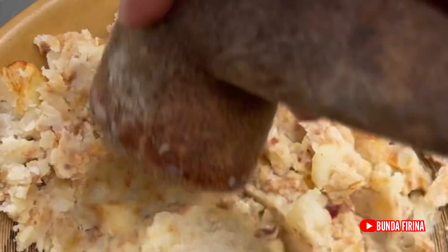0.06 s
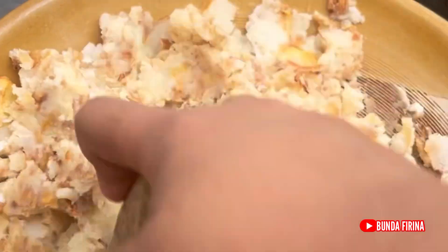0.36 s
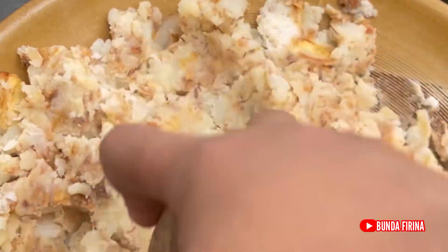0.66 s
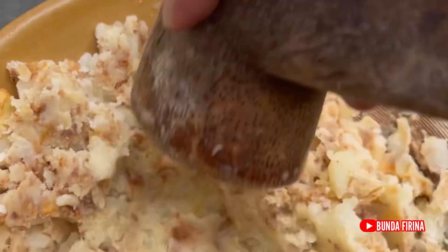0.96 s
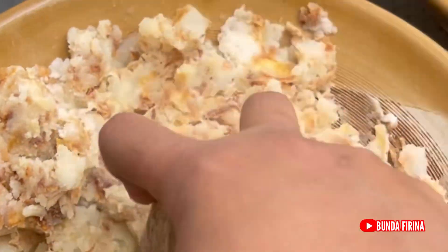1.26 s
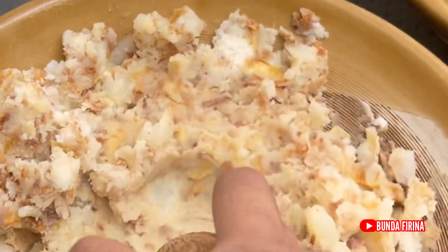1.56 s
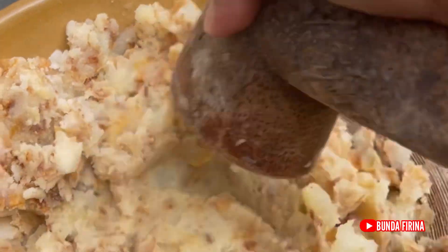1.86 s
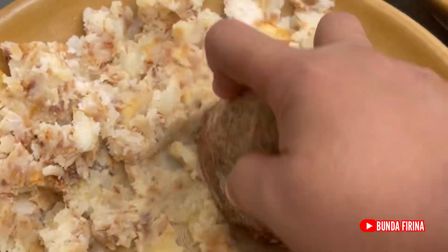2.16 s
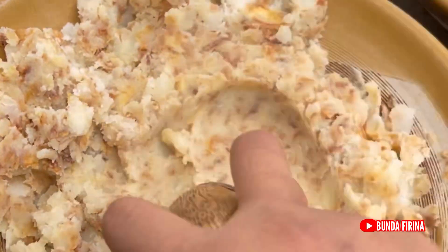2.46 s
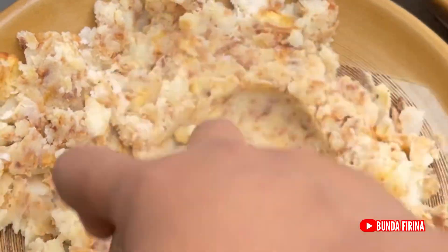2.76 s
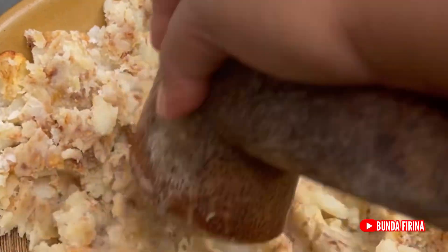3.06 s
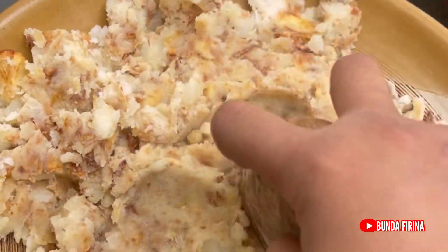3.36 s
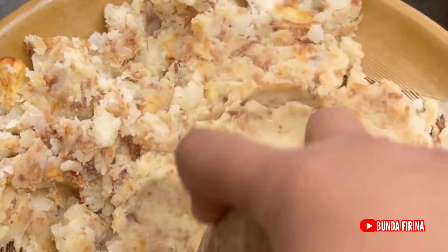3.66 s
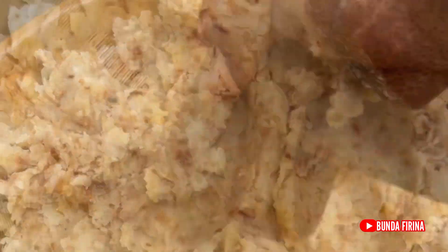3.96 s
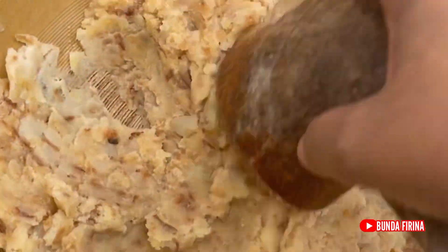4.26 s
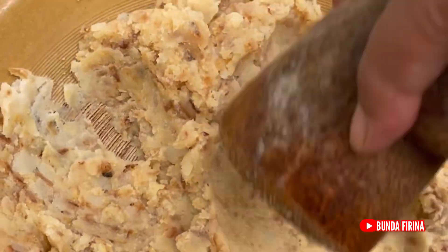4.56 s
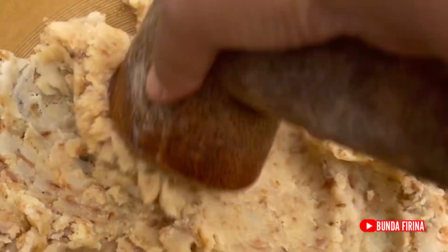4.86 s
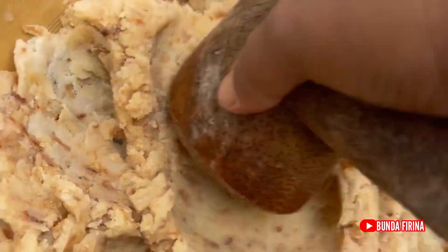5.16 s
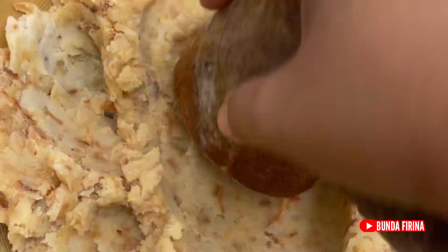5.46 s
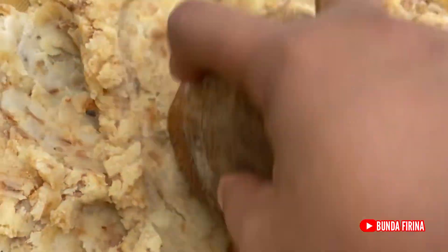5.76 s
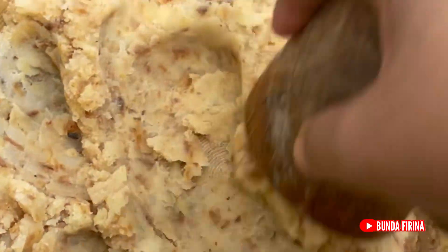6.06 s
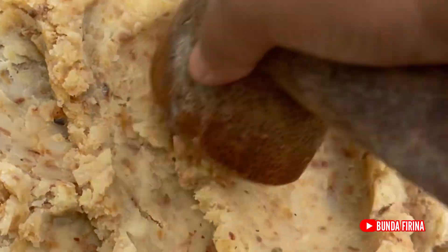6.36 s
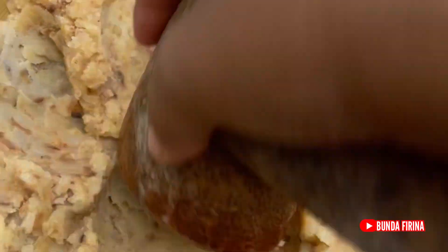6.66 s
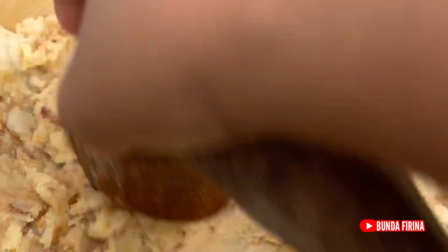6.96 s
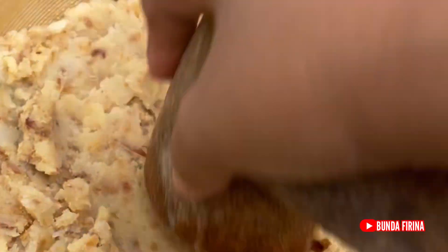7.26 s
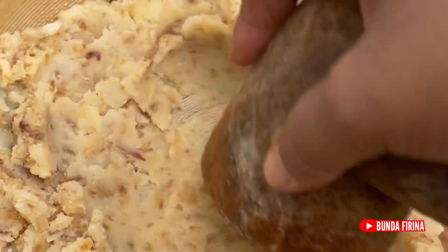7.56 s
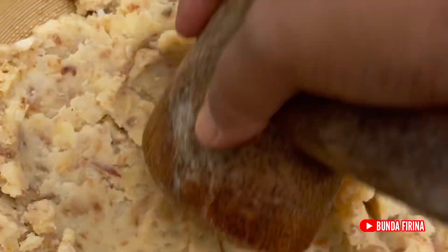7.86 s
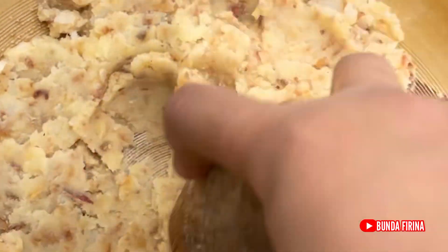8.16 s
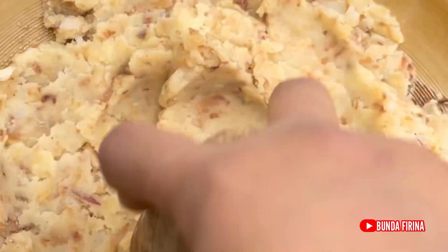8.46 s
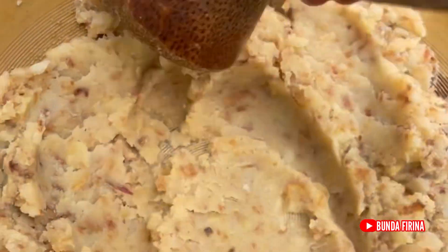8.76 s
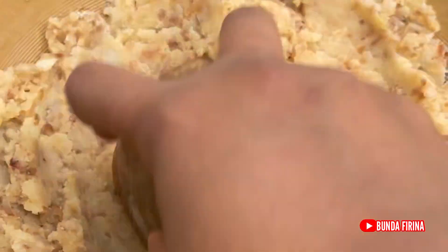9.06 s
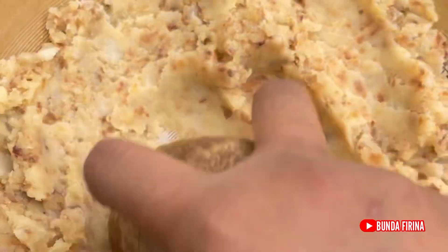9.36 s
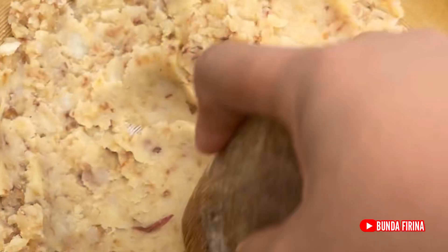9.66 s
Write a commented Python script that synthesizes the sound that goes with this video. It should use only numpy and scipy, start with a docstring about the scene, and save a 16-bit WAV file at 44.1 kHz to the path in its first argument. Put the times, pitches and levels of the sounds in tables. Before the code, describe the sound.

Close, uneven thumps and sticky squishing of potato being pounded in a bowl, with occasional sharp knocks and brief bird chirps.

```python
"""Thuds and wet squelches: a stone pestle mashes soft cooked potato in a ribbed bowl, close by.
Strokes rumble through the table, crush lumps and squeeze out wet mash, with an occasional smack;
now and then the pestle knocks through to the bowl. Shrill chirps, probably a cage bird, echo in
the kitchen over a low hum and one faint whine. The sound cuts out briefly once, and after seven
seconds it starts over."""
import sys
import numpy as np
from scipy import signal
from scipy.fft import rfft, irfft, next_fast_len
from scipy.io import wavfile
from scipy.ndimage import uniform_filter1d, map_coordinates

SR = 44100
rng = np.random.default_rng(int(sys.argv[2]) if len(sys.argv) > 2 else 0)


def unload_audio(sound):
    """Save the sound as a 16-bit wav file, at the path given as the first command line argument."""
    columns = np.transpose(np.atleast_2d(sound))
    # keep every value between -1 and 1, then stretch to whole-number steps
    steps = np.round(np.clip(columns, -1, 1) * 32767)
    wavfile.write(sys.argv[1], SR, steps.astype(np.int16))


N = 433062

# Strokes, from touching the mash to lifting off: start_s, end_s, rumble_db, squelch_db, crackle_db
STROKES = [(0.059, 0.544, -34.5, -46, -45), (0.667, 1.301, -37.5, -46, -46),
           (1.337, 1.702, -36.5, -47, -53), (1.796, 2.26, -38.5, -45.5, -43), (2.445, 2.7, -32, -41.5, -45),
           (2.901, 3.372, -28.5, -42, -41.5), (3.444, 3.75, -48, -42, -43.5),
           (3.779, 4.206, -50, -46.5, -43.5), (4.506, 5.136, -57.5, -48, -45.5),
           (5.258, 5.727, -33.5, -44.5, -46), (5.917, 6.19, -33.5, -43, -42),
           (6.476, 6.953, -36, -50.5, -47)]
TOUCH_S, LIFT_DB_PER_S = 0.02, 622  # the pestle sinks in; the sound dies as it lifts
# Firm lumps collapsing under the pestle: start_s, length_s, rumble_db
LUMPS = [(0.187, 0.13, -26.5), (0.43, 0.13, -28), (2.141, 0.085, -28), (2.451, 0.11, -26.5),
         (3.225, 0.079, -21), (3.612, 0.13, -35.5), (3.925, 0.044, -29.5), (4.788, 0.044, -34.5),
         (4.949, 0.2, -33.5), (5.312, 0.075, -29.5), (5.641, 0.08, -33.5), (5.958, 0.1, -30)]
# The deep tone of the table: frequency_hz, level_db
TABLE_TONE = [(25, -65), (50, 2), (110, 2.5), (195, 6), (250, -6.5), (310, -0.5), (600, -10.5),
              (800, -14.5), (1000, -28), (1800, -34.5), (3500, -49)]

def pestle_rumble(yield_db_per_s=14.5, crush_s=0.005, settle_db_per_s=279):
    """Grinding and collapsing lumps shake the table, less and less as the potato gives way."""
    grinding = envelope([row[:3] for row in STROKES], TOUCH_S, -yield_db_per_s, LIFT_DB_PER_S)
    lumps = [(start, start + length, db) for start, length, db in LUMPS]
    crushing = envelope(lumps, crush_s, -yield_db_per_s, settle_db_per_s)
    grit = grains(per_s=420, decay_s=0.00057, scatter_db=2, tone=TABLE_TONE, steady_s=0.06)
    return np.sqrt(grinding + crushing) * grit

# The pestle landing: start_s, level_db, hardness_hz (low when potato cushions it), clack_db (bare stone)
KNOCKS = [(0.077, -29, 790, -15), (0.191, -21, 1000, -11.5), (0.29, -25, 900, -13.5),
          (0.363, -25, 800, -15.5), (0.448, -16.5, 744, -9.5), (0.672, -13.5, 1750, -7.5),
          (0.725, -14.5, 800, -8), (1.133, -18.5, 740, -5.5), (1.807, -16.5, 644, 6.5),
          (1.908, -14.5, 710, 8), (2.109, -17.5, 640, -7), (2.396, -7.5, 3100, 2), (2.825, -18.5, 730, -12),
          (2.977, -15.5, 805, -5), (3.166, -21, 800, -7.5), (3.239, -16.5, 770, -5.5),
          (3.862, -14, 1670, -4.5), (3.907, -17.5, 840, -9), (5.026, -20.5, 750, -6.5),
          (5.281, -21.5, 940, -14.5), (5.392, -25.5, 1470, 9), (6.3597, -8, 3430, 20),
          (6.3635, -23, 2430, 18), (6.532, -23, 800, -10.5), (6.729, -26, 730, -9.5), (6.829, -24, 700, -5)]
# The notes the bowl rings with on its table: pitch_hz, level_db, ring_s (undamped time to fade 60 dB)
BOWL_NOTES = [(116.3, -8, 0.28), (180.5, -3, 0.2), (305, -17, 0.31), (475, -11, 0.12), (744, -10.5, 0.22),
              (1335, 1, 0.014), (1648, -10.5, 0.16), (1730, -5.5, 0.014), (2160, -9.5, 0.0081),
              (2803, -11, 0.1), (4260, -6, 0.086)]

def bowl_knocks(damping_hz=1400, push_db=14, rattle_db=-10, rattle_s=0.16, clack_hz=2000):
    """Each landing shoves the table and rings the bowl; potato under the pestle dulls and damps it."""
    out, t = np.zeros(N), np.arange(SR // 2) / SR
    hz, note_db, ring_s = np.transpose(BOWL_NOTES)[:, :, None]
    # Bare stone drives the short-lived middle notes and spares the low ones.
    clack_share = np.exp(-(np.log(hz / clack_hz) / 0.18) ** 2 - ring_s / 0.1)
    for start, level_db, hardness_hz, clack_db in KNOCKS:
        ring_share = hardness_hz ** 2 / (hardness_hz ** 2 + damping_hz ** 2)
        bass_loss_db = 0.32 * max(clack_db, 0) * (hz < 600)
        strength_db = note_db + clack_db * clack_share - bass_loss_db + rng.normal(0, 1, hz.shape)
        notes = amp(strength_db - 60 * t / (ring_s * ring_share)) * np.sin(2 * np.pi * hz * t)
        ring = notes[::2].sum(axis=0) - notes[1::2].sum(axis=0)  # neighbours start opposite ways
        push = amp(push_db) * (t == 0)
        rattle = amp(rattle_db - 60 * t / rattle_s) * rng.standard_normal(len(t))
        thud = amp(-0.8 * clack_db) * coloured(push + rattle, TABLE_TONE)  # bare hits hardly thud
        cushion = signal.butter(10, hardness_hz, fs=SR, output="sos")
        add(out, start, amp(level_db) * signal.sosfilt(cushion, ring + thud))
    return out

def through_table(x, lag=0.1475):
    """Bending waves in the table bring the low notes last."""
    def response(hz):
        delay_s = lag * np.maximum(1 / np.sqrt(hz + 40) - 1 / np.sqrt(1300), 0)
        return np.exp(-2j * np.pi * np.cumsum(delay_s) * hz[1])
    return filtered(x, response)

# The tone of potato being flattened: frequency_hz, level_db
SPLAT_TONE = [(600, -14), (1000, 10), (1400, 7), (2000, -2.5), (3500, -9.5), (15000, -34)]

def splats(length_s=0.0021, splat_db=-25):
    """Each landing flattens potato with a short, gritty squish, weaker when the stone lands bare."""
    landings = [(start, start + length_s, db - max(clack_db, 0)) for start, db, _, clack_db in KNOCKS]
    swell = np.sqrt(envelope(landings, rise_s=0.0023, slope_db_per_s=0, fade_db_per_s=300))
    grit = grains(per_s=900, decay_s=0.0012, scatter_db=3.5, tone=SPLAT_TONE, steady_s=0.017)
    return amp(splat_db) * swell * grit

# Wet mash squirting out from under the pestle: start_s, length_s, squelch_db, crackle_db
SQUEEZES = [(0.205, 0.045, -39, -37), (0.43, 0.068, -38, -37), (0.912, 0.087, -44.5, -33.5),
            (1.109, 0.03, -41, -36), (1.226, 0.043, -41.5, -34), (1.463, 0.11, -43.5, -38),
            (1.586, 0.072, -45, -39.5), (1.853, 0.17, -46, -38.5), (2.159, 0.033, -39, -32.5),
            (2.195, 0.072, -36.5, -38), (2.565, 0.044, -35, -40), (3.017, 0.045, -52, -37),
            (3.265, 0.047, -37.5, -33.5), (3.539, 0.019, -38.5, -36), (3.643, 0.081, -58, -38),
            (4.055, 0.024, -55, -33), (4.792, 0.031, -41.5, -34.5), (4.96, 0.01, -32, -27),
            (5.065, 0.024, -37.5, -32.5), (5.346, 0.11, -39.5, -42.5), (5.575, 0.019, -42, -36.5),
            (5.675, 0.039, -34, -35.5), (6.56, 0.026, -37, -38), (6.656, 0.11, -44.5, -44),
            (6.836, 0.063, -40, -36)]
# The tone of the squelch: frequency_hz, level_db
SQUELCH_TONE = [(600, -19), (1300, -3.5), (2600, 1.5), (6000, 4), (9000, -3.5), (15000, -22)]
# The tone of the crackle, with the microphone's bright ring near 11 kHz: frequency_hz, level_db
CRACKLE_TONE = [(1000, -30.5), (3000, -16.5), (6000, -4.5), (8000, -2.5), (9800, 0), (11200, 6.5),
                (12100, -4.5), (13000, -7.5), (14000, -29), (15700, -66)]

def wet_mash(clump_db=2.5, squelch_db=-0.5, fizz_db=-1, snaps_db=-1.9, wet_snaps_db=-8.5, cling_db=-62):
    """Squeezed potato squelches; its sticky films tear in a fine fizz and snaps, fuller where wet."""
    *_, stroke_squelch, stroke_crackle = np.transpose(STROKES)
    *_, squeeze_squelch, squeeze_crackle = np.transpose(SQUEEZES)
    flow = wetness(stroke_squelch, squeeze_squelch)
    tearing = wetness(stroke_crackle, squeeze_crackle) + amp(cling_db)  # clinging mash keeps crackling
    wet_grains = grains(per_s=1100, decay_s=0.0011, scatter_db=6, tone=SQUELCH_TONE, steady_s=0.08)
    squelch = amp(squelch_db) * flow * air_channels(wet_grains)
    fine_grains = grains(per_s=1500, decay_s=0.0003, scatter_db=5, tone=CRACKLE_TONE, steady_s=0.05)
    fizz = amp(fizz_db) * tearing * fine_grains
    ticks = grains(per_s=70, decay_s=0.0004, scatter_db=3, tone=CRACKLE_TONE, steady_s=0.38)
    snaps = amp(snaps_db) * tearing * ticks + amp(wet_snaps_db) * flow * unit(muffled(ticks))
    return amp(clump_db * drift(18, N)) * (squelch + fizz) + snaps

def wetness(strokes_db, squeezes_db, swell_db_per_s=39):
    """Loudness of a wet layer: each stroke smears; each squeeze builds, then stops short."""
    start, end = np.transpose(STROKES)[:2]
    smearing = envelope(zip(start, end, strokes_db), TOUCH_S, 0, LIFT_DB_PER_S)
    start, length = np.transpose(SQUEEZES)[:2]
    squeezes = zip(start, start + length, squeezes_db - swell_db_per_s * length / 2)
    squirting = envelope(squeezes, rise_s=0.011, slope_db_per_s=swell_db_per_s, fade_db_per_s=769)
    return np.sqrt(smearing + squirting)

def air_channels(x, centre_hz=2700, roam=0.31):
    """Air channels in the mash change size, so the pitch they boost wanders."""
    hz, t, spectrum = signal.stft(x, SR, nperseg=256)
    log_pitch = np.interp(t, np.arange(N) / SR, np.log(centre_hz) + roam * drift(22, N))
    boost = 1 + 1.6 * np.exp(-((np.log(hz[:, None] + 1) - log_pitch) / 0.17) ** 2)
    return unit(signal.istft(spectrum * boost, SR, nperseg=256)[1][:N])

def muffled(x, corner_hz=4000):
    """A layer of wet mash takes the treble off a tick."""
    return filtered(x, lambda hz: (1 + 1j * hz / corner_hz) ** -3)

# Larger air pockets bursting in the mash: start_s, level_db
POPS = [(0.309, -20), (0.3925, -14), (0.4217, -15), (0.4875, -29), (0.9453, -26.5), (1.026, -10),
        (1.0566, -15), (1.0682, -15), (1.2005, -16), (1.531, -19), (1.552, -8), (1.7922, -23), (1.81, -12),
        (1.925, -13), (2.003, -19), (2.295, -18.5), (2.397, -17.5), (3.04, -13), (3.82, -21.5), (4.15, -10),
        (5.756, -19.5), (6.857, -18), (6.871, -18), (6.8887, -13)]

def air_pops(body_db=5):
    """Air pockets burst with a sharp tick and a little body."""
    ticks = np.zeros(N)
    for start, db in POPS:
        add(ticks, start, amp(db) * click(decay_s=0.0011, tone=CRACKLE_TONE))
    return ticks + amp(body_db) * muffled(ticks)

# Suction breaking under the pestle, plus one light knock at 4.291 s played as the same wet smack: start_s,
# level_db
SMACKS = [(1.9665, -21), (2.2402, -13), (2.275, -18), (2.68, -24.5), (2.698, -15), (3.2909, -18.5),
          (4.291, -22.5), (4.829, -12), (4.978, -8.5), (5.0803, -19), (5.69, -21), (5.932, -12)]

def suction_smacks(tick_db=-5):
    """Breaking suction gives a full, wet smack with a tick on top."""
    out = np.zeros(N)
    for start, db in SMACKS:
        smack = click(decay_s=0.00099, tone=SQUELCH_TONE)
        tick = amp(tick_db) * click(decay_s=0.0011, tone=CRACKLE_TONE)
        add(out, start, amp(db) * (smack + tick))
    return out

# Bird notes: start_s, length_s, start_hz, end_hz, level_db, overtone_db, rasp (0 pure to 1 harsh)
CHIRPS = [(3.309, 0.027, 6780, 6680, -21.5, -20, 0.01), (4.464, 0.051, 4007, 4280, -29.5, -21, 0.47),
          (4.466, 0.0321, 2780, 2280, -34, 0.5, 0.42), (5.857, 0.037, 2165, 3690, -40, -15, 0.26),
          (5.89, 0.05, 2600, 2395, -40, -4, 0.57), (6.023, 0.023, 4140, 4206, -22.5, -12.5, 0.01),
          (6.04, 0.044, 4300, 4600, -27, -23, 0), (6.079, 0.0247, 6900, 6660, -21.5, -21, 0.1),
          (6.093, 0.02, 3300, 2500, -27, 1, 0.4), (6.111, 0.04, 3440, 3457, -26.5, 1.5, 0.32)]

def bird(waver=0.015, rasp_waver=0.06, edge_s=0.0033, third_db=-19):
    """Short gliding whistles with two overtones; harsh ones break up into a rasp."""
    out = np.zeros(N)
    rasp_tone = [(1800, -32.5), (5300, -7), (8500, -20), (12800, -9), (14500, -64)]
    for start, length, start_hz, end_hz, db, overtone_db, rasp in CHIRPS:
        t = np.arange(int(length * SR)) / SR
        glide_hz = np.interp(t, [0, length], [start_hz, end_hz])
        wobble = 1 + (waver + rasp_waver * rasp) * drift(603, len(t))
        phase = 2 * np.pi * np.cumsum(glide_hz * wobble) / SR
        overtones = amp(overtone_db) * np.sin(2 * phase) + amp(third_db) * np.sin(3 * phase)
        whistle = np.sqrt(1 - rasp) * unit(np.sin(phase) + overtones)
        hiss = np.sqrt(rasp) * coloured(rng.standard_normal(len(t)), rasp_tone)
        swell = np.clip(np.minimum(t, length - t) / edge_s, 0, 1)
        add(out, start, amp(db) * swell * (whistle + hiss))
    return out

# A faint, thin whine further off: pitch_hz, level_db
WHINE_NOTES = [(1034, -56), (1561, -53), (2040, -54), (2342, -52)]

def whine(start_s=5.35, end_s=5.51):
    """A few unsteady high notes swell and fade together."""
    t = np.arange(N) / SR
    swell = np.sqrt(envelope([(start_s, end_s, 0)], rise_s=0.039, slope_db_per_s=0, fade_db_per_s=200))
    notes = sum(amp(db) * np.sin(2 * np.pi * hz * t + 1.4 * drift(90, N)) for hz, db in WHINE_NOTES)
    return np.sqrt(2) * swell * notes

# The tone of the room's low noise: frequency_hz, level_db
HUM_TONE = [(20, -45), (50, 0), (200, -11.5), (500, -22.5), (1000, -35), (4000, -41), (11000, -61)]

def room_hum():
    """A low noise that drops a little at four seconds."""
    level_db = np.interp(np.arange(N) / SR, [3.9, 4.1], [-39.5, -43.5])
    return amp(level_db) * coloured(rng.standard_normal(N), HUM_TONE)

def close_echoes(x, ring_s=0.015, low_cut_hz=500, level_db=-13):
    """Sound bounces off the bowl wall and table, differently left and right."""
    t = np.arange(SR // 20) / SR
    bounces = rng.standard_normal((2, len(t))) * amp(-60 * t / ring_s)
    echoes = signal.fftconvolve(x[None], bounces / np.linalg.norm(bounces[0]), axes=1)[:, :N]
    return amp(level_db) * filtered(echoes, lambda hz: hz ** 2 / (hz ** 2 + low_cut_hz ** 2))

# How long the kitchen echoes: frequency_hz, ring_s (time to fade 60 dB)
ECHO_TIMES = [(200, 1), (4000, 0.53), (13000, 0.3)]

def kitchen_echo(x):
    """The room's echo, different left and right; the treble dies first."""
    hz, t, noise = signal.stft(rng.standard_normal((2, SR)), SR, nperseg=256)
    fade = amp(-60 * t / along(ECHO_TIMES, hz)[:, None])
    tail = signal.istft(noise * fade, SR, nperseg=256)[1]
    return signal.fftconvolve(x[None], tail / np.linalg.norm(tail[0]), axes=1)[:, :N]

# How far the wave on the left is ahead of the right: frequency_hz, phase_radians
STEREO_PHASE = [(400, 0), (750, .7), (1400, 0), (3200, .7), (4200, 1.2), (4800, 3.1), (5600, 6.1),
                (6400, 6.6), (8000, 8.3), (12000, 12.3), (14000, 12.6)]

def stereo(x):
    """Sound reaches two microphone openings slightly out of step."""
    sides = np.array([[1], [-1]])
    return filtered(x, lambda hz: np.exp(0.5j * along(STEREO_PHASE, hz) * sides))

def grains(per_s, decay_s, scatter_db, tone, steady_s, size=96):
    """Tiny bursts of unequal strength at random times, their level evened out over steady_s."""
    count = int(per_s * N / SR)
    starts = rng.integers(0, N, count)
    strengths = amp(scatter_db * np.clip(rng.standard_normal((count, 1)), -3, 2.5))
    bursts = strengths * rng.standard_normal((count, size)) * np.exp(-np.arange(size) / (decay_s * SR))
    positions = starts[:, None] + np.arange(size)
    x = unit(coloured(np.bincount(positions.ravel(), bursts.ravel(), N)[:N], tone))
    width = max(int(steady_s * SR), 2)
    power = uniform_filter1d(uniform_filter1d(x ** 2, width), width)
    return x / np.sqrt(np.abs(power) + 1e-4)

def click(decay_s, tone):
    """A short burst of noise with peak 1."""
    t = np.arange(SR // 100) / SR
    burst = coloured(rng.standard_normal(len(t)) * np.exp(-t / decay_s), tone)
    return burst / np.abs(burst).max()

def envelope(events, rise_s, slope_db_per_s, fade_db_per_s):
    """Summed power of (start_s, end_s, level_db) events: each rises, slopes, then dies away."""
    power, t = np.zeros(N), np.arange(SR) / SR
    for start, end, db in events:
        level_db = db + slope_db_per_s * t - fade_db_per_s * np.maximum(t - (end - start), 0)
        add(power, start, (np.minimum(t / rise_s, 1) * amp(level_db)) ** 2)
    return power

def coloured(x, tone, size=8192):
    """Give x a tone of (frequency_hz, level_db) points; white noise keeps its level."""
    cepstrum = irfft(np.log(amp(along(tone, np.fft.rfftfreq(size, 1 / SR)))))
    cepstrum[1:size // 2] *= 2  # folded so that the filter rings after a sound, never before
    cepstrum[size // 2 + 1:] = 0
    ring = irfft(np.exp(rfft(cepstrum)))
    return signal.fftconvolve(x, ring / np.linalg.norm(ring))[:len(x)]

def filtered(x, response):
    """Scale and shift each frequency of x by response(hz)."""
    size = next_fast_len(N + SR // 2)
    return irfft(rfft(x, size) * response(np.fft.rfftfreq(size, 1 / SR)), size)[..., :N]

def drift(per_s, count):
    """A smooth curve of count samples through per_s random values a second."""
    values = rng.standard_normal(int(count * per_s / SR) + 4)
    return map_coordinates(values, [np.arange(count) * per_s / SR])

def along(points, hz):
    """Read between (frequency_hz, value) points on a log axis."""
    frequencies, values = np.transpose(points)
    return np.interp(np.log(hz + 1), np.log(frequencies + 1), values)

def add(track, start_s, sound):
    """Mix a sound into a track."""
    part = track[round(start_s * SR):][:len(sound)]
    part += sound[:len(part)]

def amp(db):
    """Decibels to gain."""
    return 10 ** (np.asarray(db) / 20)

def unit(x):
    """Scale to an average power of 1."""
    return x / np.sqrt(np.mean(x ** 2) + 1e-20)

def scene():
    """The bowl is close with little echo, the bird far and echoing, over a low room noise."""
    pestle = pestle_rumble() + through_table(bowl_knocks())
    mashing = pestle + splats() + wet_mash() + air_pops() + suction_smacks()
    chirps, hum = bird(), room_hum()
    direct = stereo(mashing + amp(3) * chirps + whine() + hum)
    into_room = amp(-19) * filtered(mashing, lambda hz: hz / (hz + 700) / (1 + (hz / 7000) ** 4))
    return direct + close_echoes(mashing) + kitchen_echo(amp(2.5) * chirps + into_room)

GAP_START_S, GAP_END_S, REPEAT_S, TOP_HZ = 4.405, 4.466, 308063 / SR, 15750

def record(dry):
    """The sound drops briefly to near silence, later starts over, and loses its highest treble."""
    t = np.arange(N) / SR
    cut = dry * np.where((t > GAP_START_S) & (t < GAP_END_S), amp(-41), 1)
    looped = cut[:, np.arange(N) % round(REPEAT_S * SR)]
    return filtered(looped, lambda hz: hz < TOP_HZ)

dry = scene()
out = record(dry)
unload_audio(out)
```